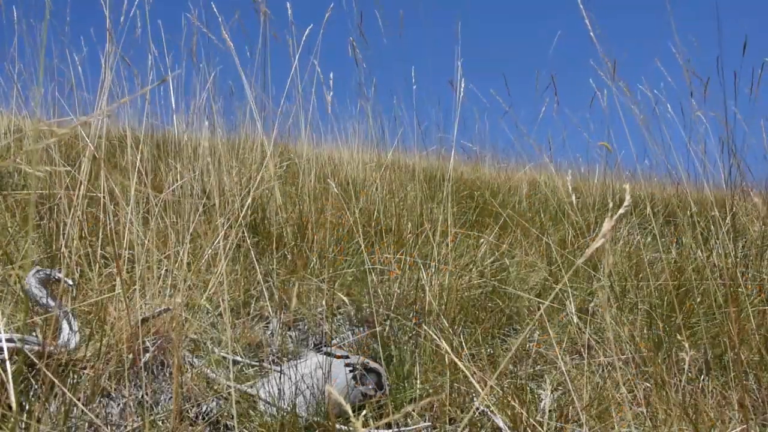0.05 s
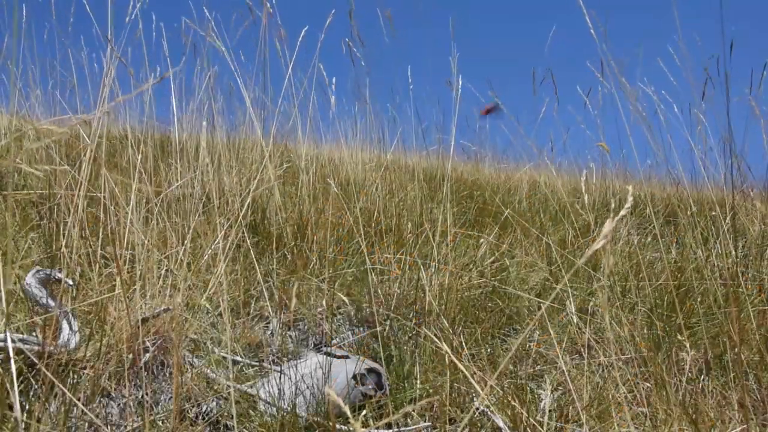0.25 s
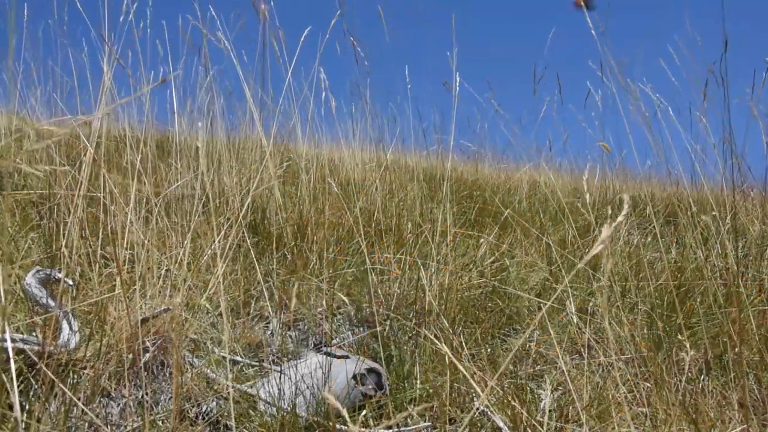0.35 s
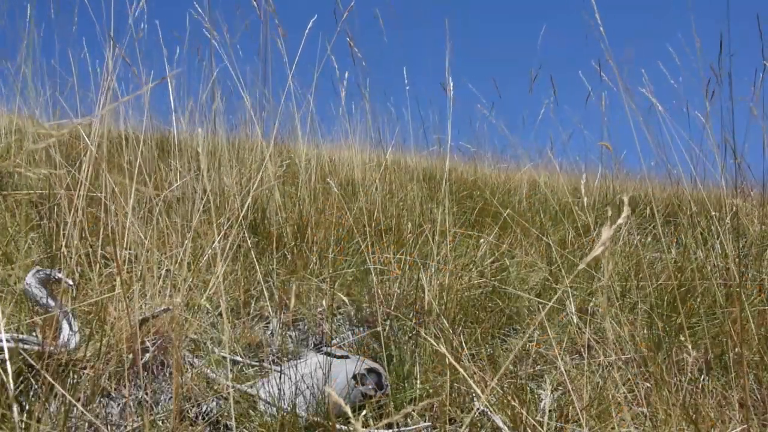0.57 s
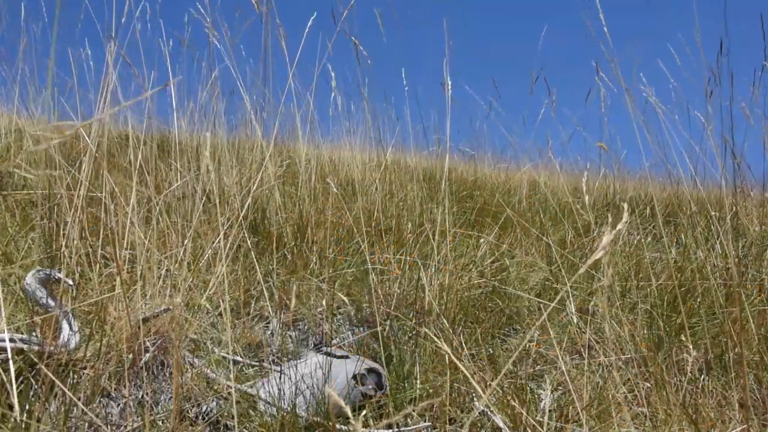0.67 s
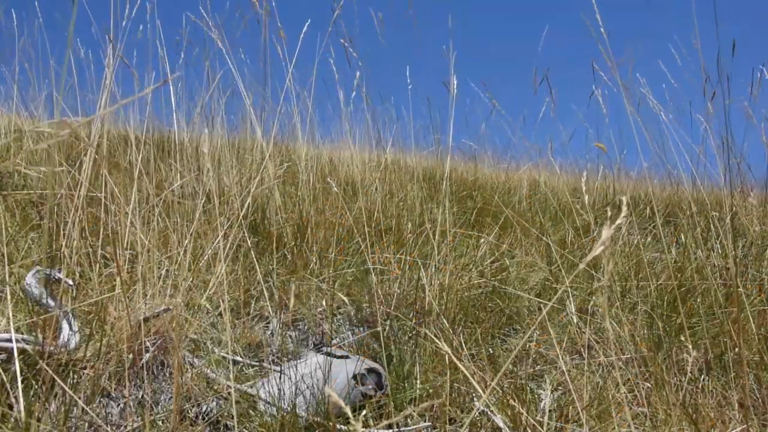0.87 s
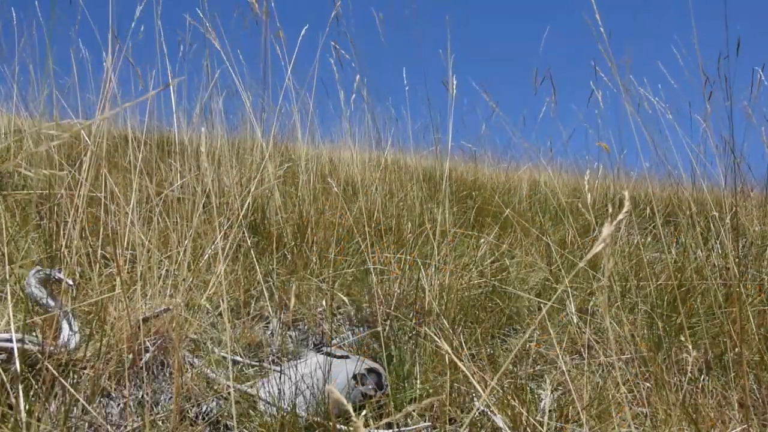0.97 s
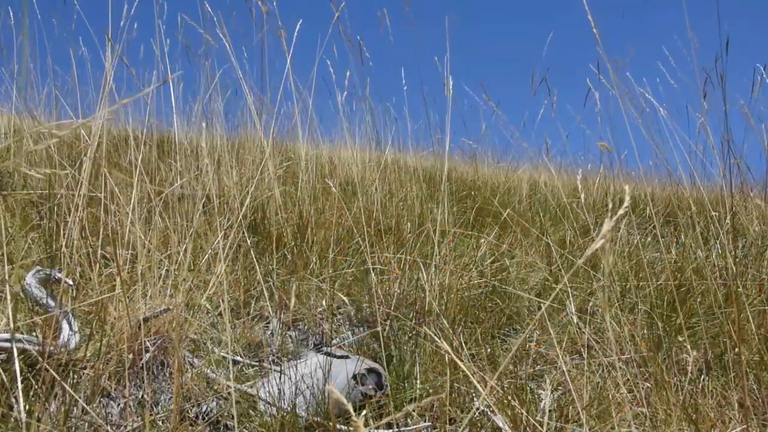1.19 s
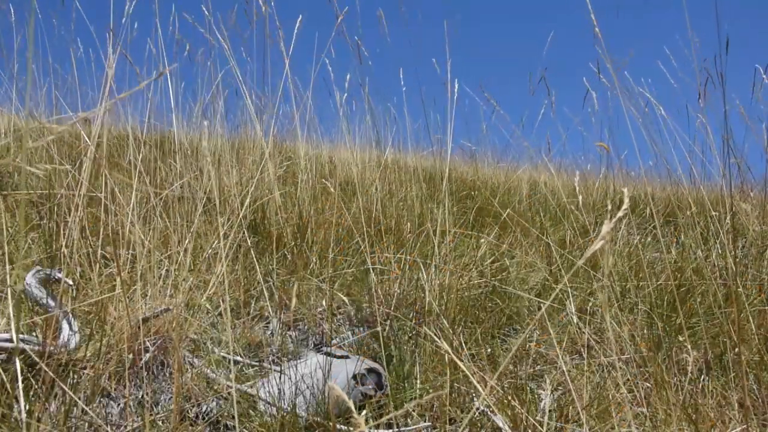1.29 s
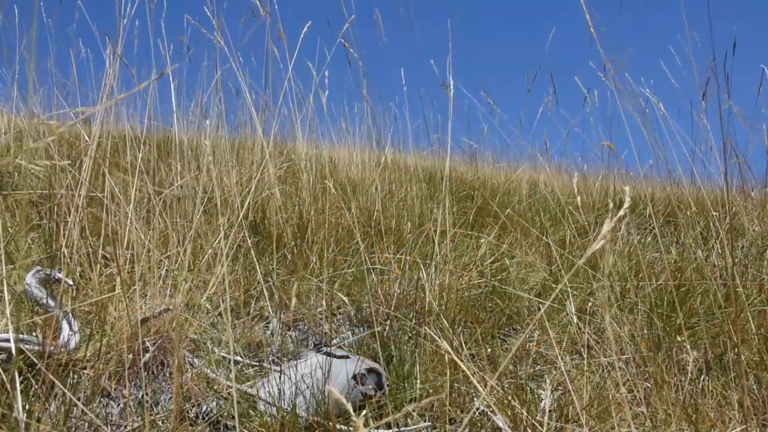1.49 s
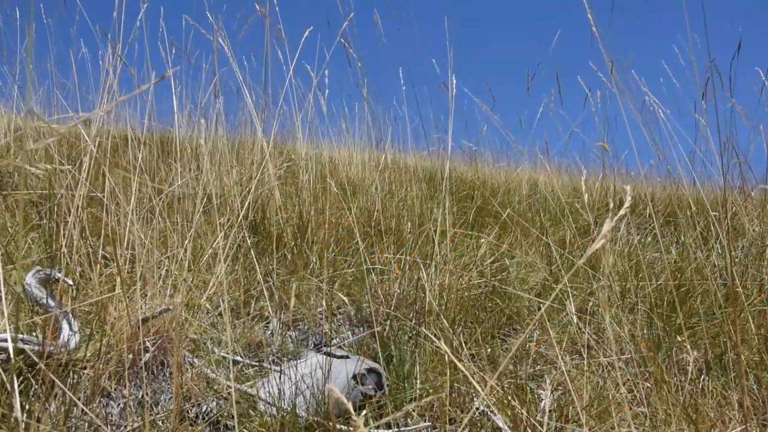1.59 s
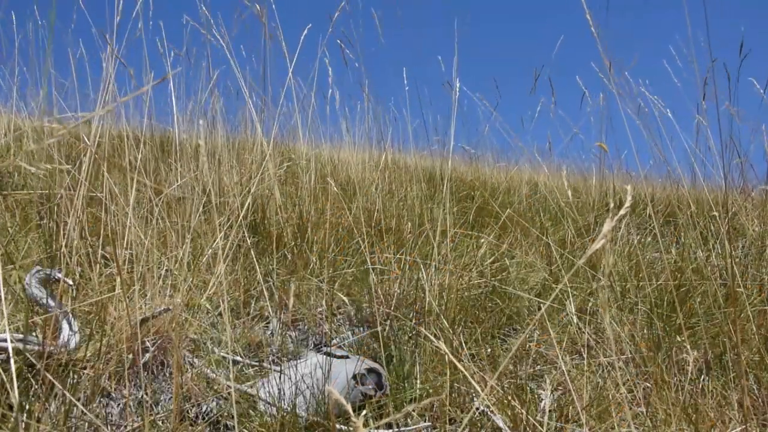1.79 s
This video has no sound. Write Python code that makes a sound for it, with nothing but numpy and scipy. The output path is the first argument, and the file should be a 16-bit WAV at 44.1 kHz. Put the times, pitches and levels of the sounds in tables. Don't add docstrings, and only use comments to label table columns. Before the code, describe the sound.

A grasshopper's crackling flight over a dry grassy slope, heard close in stereo. Faint air hiss, low rumble and a barely audible drone run throughout. At about 0.24 s uneven dry wing snaps begin, with slight papery rustle. From 0.65 s they become loud, bright and regular, about thirty-three per second, leaning right. After 1.3 s they weaken, ending near 1.7 s, leaving only quiet air.

```python
import sys
import numpy as np
from scipy import signal
from scipy.fft import rfft, irfft
from scipy.io import wavfile
from scipy.ndimage import uniform_filter1d, minimum_filter1d

SR = 44100
rng = np.random.default_rng(int(sys.argv[2]) if len(sys.argv) > 2 else 0)


def unload_audio(sound):
    columns = np.transpose(np.atleast_2d(sound))
    steps = np.round(np.clip(columns, -1, 1) * 32767)
    wavfile.write(sys.argv[1], SR, steps.astype(np.int16))


def decibels_to_gain(level_db):
    exponent = np.asarray(level_db, float) / 20
    return 10 ** exponent


N = 81585

# (frequency [Hz], density [dB/Hz])
AIR_SPECTRUM = [(12, -62), (45, 0), (200, -8), (330, -10.5), (1400, -15.5), (2000, -18.5), (8000, -19.5),
                (16000, -17)]
# (frequency [Hz], share [0..1])
AIR_CORRELATION = [(100, 0), (640, 0.4), (15000, 0.23)]
# (time [s], crack level [dB], vein tick lead [ms], low
# mode [Hz], high mode [Hz])
WING_SNAPS = [(0.2369, -38, 1, 1310, 7960), (0.248, -20, 0.73, 2950, 8600),
              (0.2724, -15, 0.21, 4860, 9300), (0.2995, -31.5, 0.58, 3830, 8250),
              (0.3256, -16, 0.86, 4100, 9600), (0.3535, -26.5, 0.53, 2500, 8100),
              (0.3811, -40, 1, 1810, 7100), (0.4068, -32.5, 0.82, 4400, 7360),
              (0.4183, -43, 0.71, 1380, 4500), (0.4325, -21.5, 0.28, 3920, 8200),
              (0.4599, -27.5, 0.65, 4070, 7200), (0.4856, -17.5, 0.5, 4600, 7550),
              (0.5115, -27, 0.61, 1930, 9900), (0.5378, -20, 0.89, 1840, 7900),
              (0.5655, -14, 0.51, 1990, 7960), (0.5945, -23.5, 0.71, 4700, 8000),
              (0.6222, -20.5, 0.83, 1940, 7850), (0.6507, -16.5, 0.12, 4440, 7960),
              (0.6787, -11.5, 0.41, 4870, 8200), (0.7067, -11, 0.64, 4800, 8060),
                (0.7363, -12.5, 0.59, 4770, 8440), (0.7671, -17, 0.23, 4570, 8500),
                (0.7965, -12.5, 0.37, 1660, 8900), (0.826, -13, 0.6, 5200, 8350),
                (0.8561, -15.5, 0.39, 5370, 8560), (0.8864, -17.5, 0.57, 1950, 8000),
                (0.9166, -16.5, 0.38, 5370, 9600), (0.9462, -24, 0.67, 5600, 8050),
                (0.9758, -23, 0.59, 5640, 9500), (1.0048, -17, 0.38, 2330, 9700),
                (1.0327, -17, 0.34, 2570, 10300), (1.0617, -22.5, 0.86, 1520, 8800),
                (1.0917, -24, 0.49, 5700, 9200), (1.1238, -23, 0.41, 5470, 9000),
                (1.156, -21.5, 0.54, 5800, 9500), (1.1886, -19.5, 0.72, 5470, 9900),
                (1.2207, -21.5, 0.58, 5770, 9450), (1.2524, -22, 0.4, 5830, 8700),
                (1.2841, -22.5, 0.55, 6140, 9100), (1.3155, -21, 0.52, 5000, 9800),
              (1.2152, -36, 0.29, 8500, 5500), (1.3804, -45, 0.38, 1980, 8800),
              (1.4106, -25, 0.39, 5500, 5800), (1.4411, -25.5, 0.58, 5450, 8600),
              (1.473, -22.5, 0.41, 6100, 10300), (1.5037, -32.5, 0.57, 2010, 7260),
              (1.5337, -21.5, 0.94, 3260, 6740), (1.5618, -21, 0.32, 5340, 8900),
              (1.59, -30, 0.61, 3460, 9100), (1.62, -33.5, 0.65, 3680, 6760),
              (1.6498, -30.5, 0.59, 2240, 7500), (1.6739, -35.5, 0.71, 3450, 4970)]
# (low ring [dB], high ring [dB], bass [dB], treble [dB],
# extra left shading [dB])
WING_ATTITUDE = [(10, -3, 7, -8, -1), (-2, -1, -2, -5, 0), (1.5, 8, 3.5, 0, -1.5), (-8, 6, 11, 2, -1.5),
                 (5.5, 8, -1, -3, 0), (-1, 2, 3, -5, 0.5), (14, 2, -1, -2, -1), (11, 5, 12, 7, 0.5),
                 (10, -3, 1, -3, -1), (-8, 4, 7, 3, -0.5), (11, 14, 10, 0.0, 2), (12, 12, 1, 7, 1),
                 (9, 3.5, -7, 0.5, 0), (-0.5, 0, -2.5, 0, 1), (-6, 7.5, 0.5, 0.5, -1.0),
                 (5.5, 9, 6, 0.5, 1), (-2, -2, -0.5, -8, 0.5), (15, 11, 6, 8, 0.5),
                 (3.0, 10.5, 3.5, 2, 1), (7.0, 11.5, 2, 0.5, 0.5), (4.9, 12.5, 3, 2, 0),
                   (3.5, 2, 5.5, 8, 1.5), (5.9, 6.5, -3, -0.5, 1), (8.9, 8.5, 2, 0.5, 1),
                   (4.5, 12, 7, 6, 1.5), (5.8, 1, -7.5, 2, 3.0), (1.9, 7.5, 3.5, 1.5, 3),
                   (10, -0.5, 7, -2, 3.5), (7.0, 8, 4.5, -9, 2.5), (7.8, 7, -2.5, -2, 3.0),
                   (5.9, -4, -0.5, 0.5, 1.5), (5.5, 2, -4.5, -5, 2.5), (7.5, 8, 5, -1, 1),
                   (3.6, 7, 5, -3, 2), (5.0, 8, 7, -1.5, 1.5), (4.5, 8.5, 3, 0, 3), (5.4, 6, 2.5, 4.0, 1),
                   (3, 15, 11.5, 1, 0.5), (5.2, 10, 6.5, -0.5, 1), (3.0, 5.5, 0.0, -4, 0),
                 (13.0, 0.0, 3.0, -0.5, -2), (10, 0.0, 3, -8, 0.0), (5, 9, 5.5, 0, 0.5),
                 (10, 5, 0.5, -4, 3), (0.5, 9, 2.5, -1, -0.5), (11, -3, -7, -5, 2), (5, 9, 3.5, 11, 0.5),
                 (7, 10, -3, -0.5, 3), (4, -5, -2, -2, 2.5), (8, -6, -3, 1, 2), (5, -12, -1.5, -1, 1.0),
                 (-5, 12, 5, 3, 2)]
WING_CANCEL_HZ = [2400, 4320, 2120, 1710, 2060, 1620, 2210, 3170, 2400, 2760, 1490, 2480, 2190, 5200, 3000,
                  6060, 3250, 2660, 2500, 3950, 1950, 3370, 3120, 3940, 3460, 2760, 3820, 2890, 3940, 3940,
                  3270, 4500, 4590, 4080, 3590, 4450, 4000, 3370, 2980, 4040, 3000, 3400, 3370, 4190, 4450,
                  5360, 2720, 2720, 2800, 1710, 3000, 2600]
# (time [s], left shading [dB], treble [dB], bass [dB], echo [dB])
FLIGHT_PATH = [
    (.2, 5, -15.5, 2.5, -1),
    (.4, 4, -17.5, 2.5, 11),
    (.7, 6, -6.5, 3, 3.5),
    (.95, 4.5, -7, 1, 6.5),
    (1.3, 6.5, -9.5, 5.5, 8),
    (1.7, 5.5, -5.5, 1.5, 6.5),
]
# (frequency [Hz], share [1])
SHADE_SHARE = [(1000, 2), (3000, 1.35), (6000, 0.69), (9000, 0.27), (12000, 0.55), (16000, 1.2)]
# (frequency [Hz], gain [dB])
CRACK_SPECTRUM = [(300, -48), (800, -12.5), (2000, -7.5), (5000, -3.5), (8500, -4.5), (11500, -4),
                  (15500, 5.5), (17500, -17.5)]
# (time [s], level [dB])
RUSTLE_LEVEL = [
    (.3, -101),
    (.36, -57.5),
    (.42, -62.5),
    (.5, -62),
    (1.52, -80),
    (1.58, -62),
    (1.66, -107),
]
# (frequency [Hz], threshold offset [dB])
GATE_BIAS = [(2000, -12), (4000, -1.5), (16000, 2.5)]

SNAP_SIZE, SNAP_ONSET = 2048, 100
SNAP_HZ = np.fft.rfftfreq(SNAP_SIZE, 1 / SR)
SNAP_MS = (np.arange(SNAP_SIZE) - SNAP_ONSET) * 1000 / SR
HISS_EDGE_HZ = 15900


def evened(x):
    return x / np.sqrt(np.mean(x ** 2) + 1e-20)


def read(points, hz):
    f, value = np.transpose(points)
    return np.interp(np.log(hz + 1), np.log(f + 1), value)


def causal(db):
    log_gain = db * np.log(10) / 20
    full = np.concatenate([log_gain, log_gain[-2:0:-1]])
    return np.exp(np.conj(signal.hilbert(full))[:len(db)])


def air():
    air_db, drone_db, left_db = -57, -73, -1.5
    patch_db, swell_db, gust_db, gust_hz = 0.4, 0.83, .8, 280
    drone_hz, drone_width_hz = 204, 30
    frames, hz = N // 512 + 5, np.fft.rfftfreq(2048, 1 / SR)
    a, b, c, d, patches = rng.standard_normal((frames, 1025, 5)).T
    patches = uniform_filter1d(patches, size=20, axis=0)
    patches = evened(uniform_filter1d(patches, size=8, axis=1))
    swell = evened(uniform_filter1d(rng.standard_normal(frames), size=12))
    same = np.clip(read(AIR_CORRELATION, hz), -1, 1)[:, None]
    left = a + 1j * b
    right = same * left + np.sqrt(1 - same ** 2) * (c + 1j * d)
    z = np.array([left * decibels_to_gain(left_db), right])
    wind_db = swell_db + gust_db / (1 + (hz[:, None] / gust_hz) ** 4)
    z = z * decibels_to_gain(patch_db * patches + wind_db * swell)

    def layer(gain):
        return evened(signal.istft(z * gain[:, None], nperseg=2048, noverlap=1536)[1][:, :N])

    hiss = layer(decibels_to_gain(read(AIR_SPECTRUM, hz)) * (hz < HISS_EDGE_HZ))
    drone = layer(np.exp(-.5 * ((hz - drone_hz) / drone_width_hz * 2) ** 2))
    return decibels_to_gain(air_db) * hiss + decibels_to_gain(drone_db) * drone


def delay(sec):
    return np.exp(-2j * np.pi * SNAP_HZ * sec)


def mode(f, width_hz):
    return 1 / (1 + 1j * (SNAP_HZ ** 2 - f ** 2) / (SNAP_HZ + 1) / width_hz)


def veins(db, lead_ms, noise, chance):
    from_ms, t60_ms, crackle_db, tick_db, ticks_per_ms = .75, 6, -6, -1, 7
    rise_db_per_ms, vein_low_hz = 5, 2500
    relative_db = np.clip(-.55 * (db + 36), -17, 0)
    ticks = noise * (chance < ticks_per_ms * 1000 / SR) * (SNAP_MS > -from_ms)
    decay_db = -60 * np.maximum(SNAP_MS, 0) / t60_ms
    rise_db = rise_db_per_ms * np.minimum(SNAP_MS, 0)
    ticks = ticks * decibels_to_gain(crackle_db + relative_db + decay_db + rise_db)
    impulses = 1 + decibels_to_gain(tick_db + relative_db) * delay(-lead_ms / 1000)
    thin = SNAP_HZ / (SNAP_HZ - 1j * vein_low_hz)
    return delay(SNAP_ONSET / SR) * impulses + rfft(ticks) * thin


def membrane(low_hz, high_hz, low_db, high_db, bass_db, treble_db, cancel_hz):
    treble_hz, bass_hz, high_width_hz, low_width_share = 11970, 2920, 1900, .4
    cancel_depth, cancel_width_share = .85, .28
    tilt_db = treble_db / (1 + (treble_hz / (SNAP_HZ + 1)) ** 8)
    tilt_db = tilt_db + bass_db / (1 + (SNAP_HZ / bass_hz) ** 4)
    ring = 1 + decibels_to_gain(high_db) * mode(high_hz, high_width_hz)
    ring = ring + decibels_to_gain(low_db) * mode(low_hz, low_hz * low_width_share)
    ring = ring * (1 - cancel_depth * mode(cancel_hz, cancel_hz * cancel_width_share))
    body = causal(read(CRACK_SPECTRUM, SNAP_HZ) + tilt_db) * ring
    return body / np.abs(signal.hilbert(irfft(body))).max()


def scatter(echo_db, right_noise, left_only_noise):
    grass_t60_ms, grass_db, same = 26.7, -18, 0.25
    ground_ms, ground_spread_ms, ground_db = 3.9, .7, -29
    grass = decibels_to_gain(grass_db - 60 * np.maximum(SNAP_MS, 0) / grass_t60_ms) * (SNAP_MS > 0)
    ground = decibels_to_gain(ground_db) * np.exp(-.5 * ((SNAP_MS - ground_ms) / ground_spread_ms) ** 2)
    shape = (grass + ground) * np.sqrt(1000 / SR / 2)
    left = same * right_noise + np.sqrt(1 - same ** 2) * left_only_noise
    noise = np.array([left, right_noise])
    return rfft(shape * noise) / delay(SNAP_ONSET / SR) * decibels_to_gain(echo_db)


def snap(s, db, lead_ms, low_hz, high_hz, attitude, cancel_hz, draw):
    snap_db, left_lag_s = 1.5, -1.8e-5
    path_s, *path_db = np.transpose(FLIGHT_PATH)
    left_db, treble_db, bass_db, echo_db = (np.interp(s, path_s, v) for v in path_db)
    low_db, high_db, bass_db, treble_db, left_db = np.add(attitude, (0, 0, bass_db, treble_db, left_db))
    drive = veins(db, lead_ms, draw[0], draw[1])
    body = membrane(low_hz, high_hz, low_db, high_db, bass_db, treble_db, cancel_hz)
    left = decibels_to_gain(-left_db * read(SHADE_SHARE, SNAP_HZ)) * delay(left_lag_s)
    ports = np.array([left, np.ones(len(SNAP_HZ))])
    heard = ports + scatter(echo_db, draw[2], draw[3]) * np.sqrt(abs(ports))
    place = s * SR - SNAP_ONSET
    out = irfft(drive * body * heard * delay(place % 1 / SR))
    return int(place), decibels_to_gain(db + snap_db) * out


def grasshopper():
    rows = WING_SNAPS
    attitudes = WING_ATTITUDE
    out = np.zeros((2, N + SNAP_SIZE))
    draws = rng.standard_normal((len(rows), 4, SNAP_SIZE))
    draws[:, 1] = rng.random((len(rows), SNAP_SIZE))
    for row, attitude, cancel_hz, draw in zip(rows, attitudes, WING_CANCEL_HZ, draws):
        at, sound = snap(*row, attitude, cancel_hz, draw)
        out[:, at:at + SNAP_SIZE] += sound
    return out[:, :N]


def rustle():
    low_hz, grains_per_s, spread_db = 3570, 2300, 5
    grains = (rng.random((2, N)) < grains_per_s / SR) * rng.standard_normal((2, N))
    wander = evened(uniform_filter1d(rng.standard_normal(N), size=200))
    grains = grains * decibels_to_gain(spread_db * wander)
    band = signal.butter(2, [low_hz, HISS_EDGE_HZ], "band", fs=SR, output="sos")
    grains = signal.sosfilt(band, grains + .5 * grains[::-1])
    return evened(grains) * decibels_to_gain(np.interp(np.arange(N) / SR, *np.transpose(RUSTLE_LEVEL)))


def scene():
    return grasshopper() + air() + rustle()


def starve(x):
    gate_offset_db, gate_slope, spread_db, loud_ref_db, top_opens_db = -1.5, .55, 3.2, -34, -43
    window = np.sin(np.pi * (np.arange(256) + .5) / 256)
    hz, t, z = signal.stft(x, SR, window=window, nperseg=256)
    power = (abs(z) ** 2).mean(0)
    frame_db = 10 * np.log10(power.sum(0) + 1e-12)
    loud_db = -minimum_filter1d(-frame_db, size=19)
    smooth = uniform_filter1d(uniform_filter1d(power, size=4, axis=0), size=2, axis=1)
    cell_db = 10 * np.log10(smooth + 1e-20)
    over_db = cell_db - np.median(cell_db, axis=1, keepdims=True)
    chance = rng.standard_normal((len(t) // 2 + 1, len(hz) // 4 + 1))
    chance = chance.repeat(2, axis=0).repeat(4, axis=1)[:len(t), :len(hz)].T
    gate_db = gate_offset_db + gate_slope * (loud_db - loud_ref_db) + read(GATE_BIAS, hz)[:, None]
    keep = over_db + spread_db * chance > np.minimum(gate_db, 3)
    keep = keep & ((hz[:, None] < HISS_EDGE_HZ) | (frame_db > top_opens_db))
    return signal.istft(z * keep, SR, window=window, nperseg=256)[1][:, :N]


def roll_off(x):
    return signal.sosfilt(signal.butter(12, 17140, fs=SR, output="sos"), x)


def record(dry):
    low_pass = signal.firwin(255, 16700, window=("kaiser", 9), fs=SR)
    limited = signal.oaconvolve(dry, low_pass[None], "same")
    mix = starve(limited)
    return roll_off(mix)


dry = scene()
out = record(dry)
unload_audio(out)
```